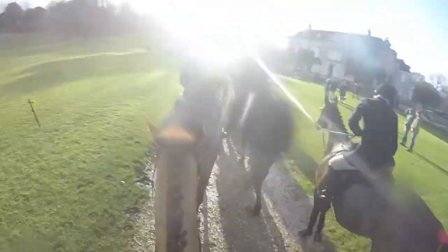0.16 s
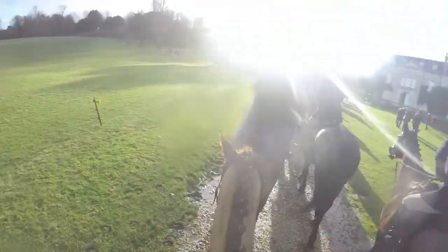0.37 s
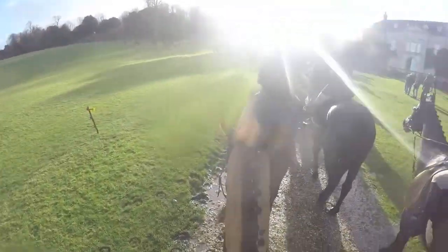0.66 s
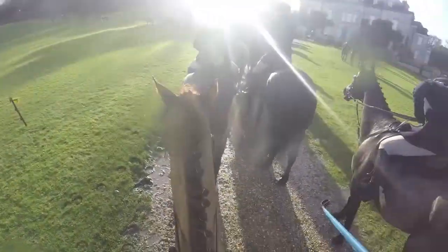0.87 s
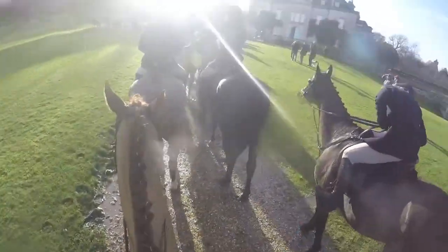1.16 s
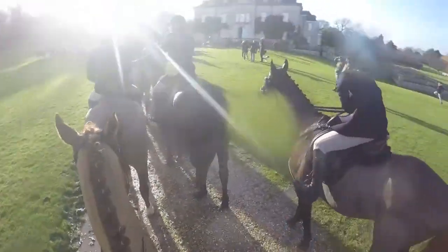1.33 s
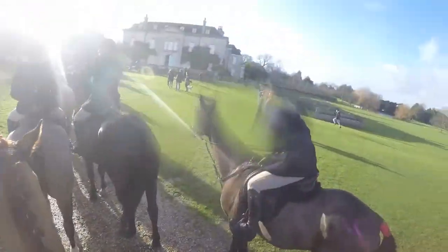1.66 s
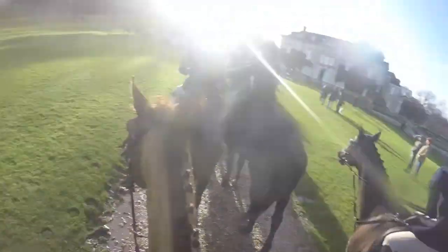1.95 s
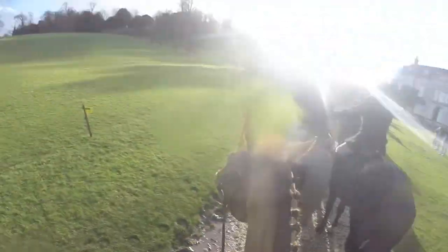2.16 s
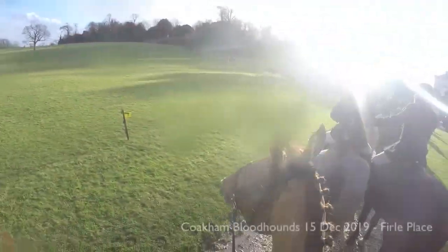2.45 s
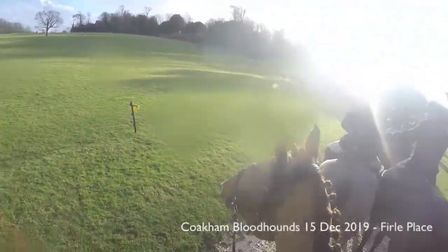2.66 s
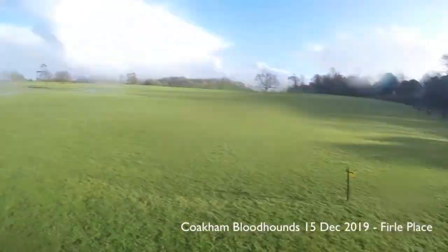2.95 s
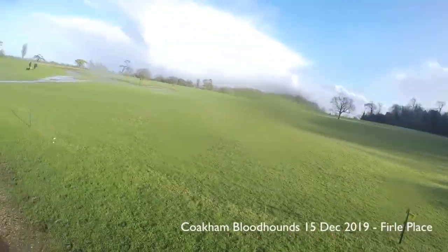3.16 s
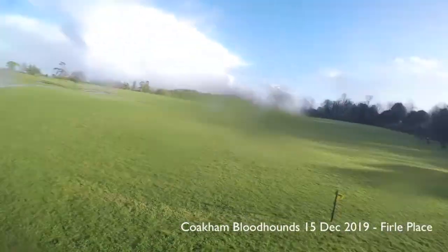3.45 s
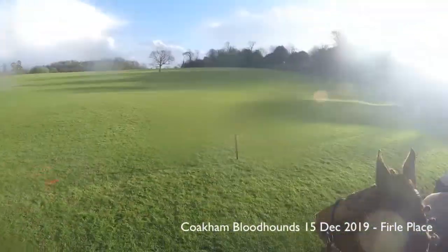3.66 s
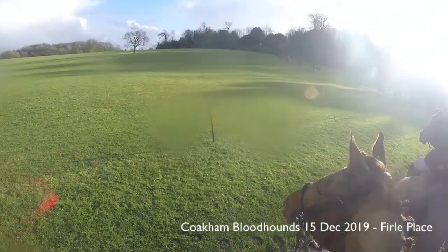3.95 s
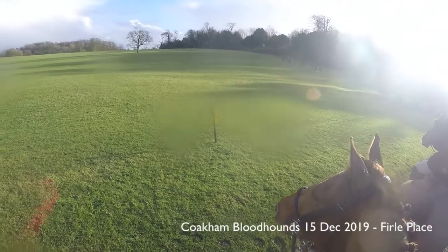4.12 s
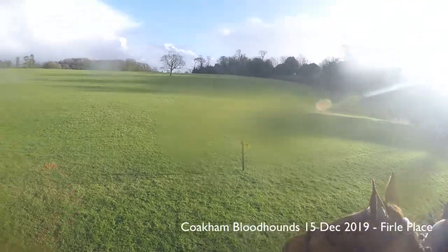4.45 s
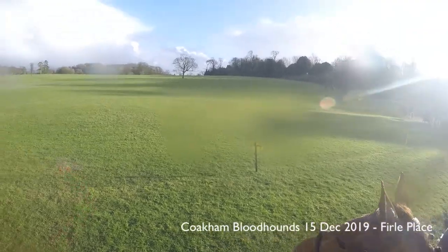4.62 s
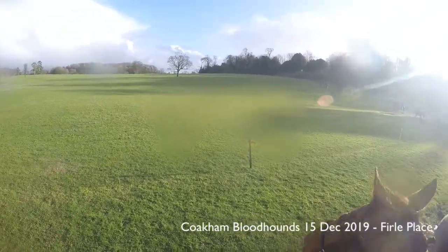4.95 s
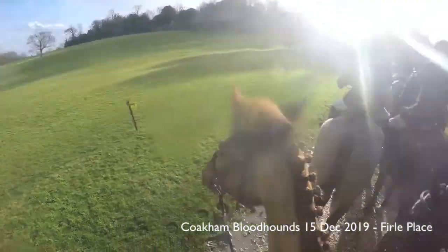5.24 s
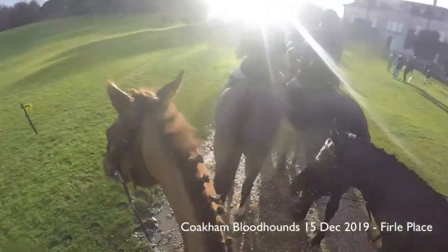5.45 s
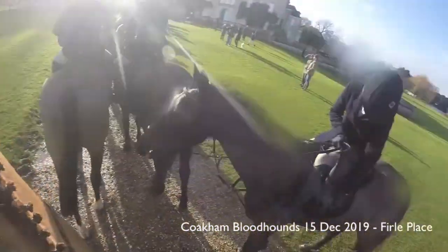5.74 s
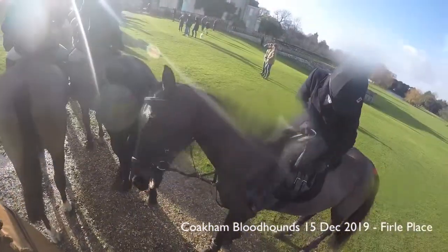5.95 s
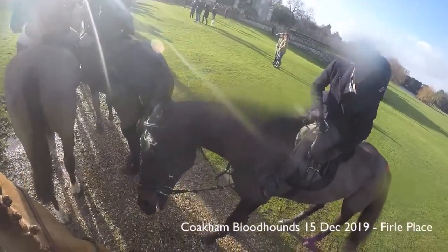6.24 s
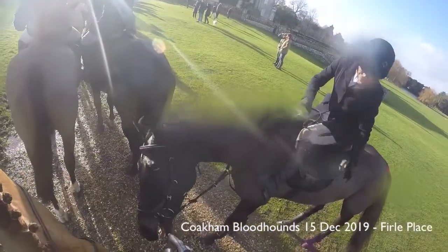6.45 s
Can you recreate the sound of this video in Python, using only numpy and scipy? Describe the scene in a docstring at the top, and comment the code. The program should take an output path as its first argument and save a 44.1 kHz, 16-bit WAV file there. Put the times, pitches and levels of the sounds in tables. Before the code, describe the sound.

Outdoors, heard from a rider's small camera, hooves grind and click on damp gravel over a low, light wind. A sharp, close knock on the camera stands out early as the loudest sound, followed by a few small ticks. The hoof sounds grow sparse and quiet, with a brief faint rustle of cloth, before a hoof clops more clearly near the end. There is no echo.

```python
"""Hooves crunch and clack on a wet gravel track as horses shuffle in open parkland, heard from a small
camera worn by a rider. The gravel is thousands of tiny contacts, each ringing a pebble; hooves clop
and squelch, and tack chinks. One hard knock rings the camera's case, whose resonances colour the
stones too. Close by, the mount ticks and a sleeve rubs, while light wind rumbles on the case."""
import sys
import numpy as np
from scipy import signal
from scipy.fft import rfft, irfft, next_fast_len
from scipy.io import wavfile
from scipy.ndimage import uniform_filter1d

SR = 44100
rng = np.random.default_rng(int(sys.argv[2]) if len(sys.argv) > 2 else 0)


def generate_wav(signal):
    """Clip the signal to [-1, 1] and save it as 16-bit WAV at the path in sys.argv[1]."""
    frames = np.transpose(np.atleast_2d(signal))
    scaled = np.clip(frames, -1, 1) * 32767
    pcm = np.round(scaled).astype(np.int16)
    wavfile.write(sys.argv[1], SR, pcm)


N = 290220
TIME = np.arange(N) / SR

# Cue levels are faders: a layer may add its own trim.
# A hoof presses or drags through gravel. Each row: start and length in seconds, grit level in dB,
# then body and wet spray in dB against the grit.
CRUNCHES = [(0.029, 0.049, -54, -9, -39), (0.12, 0.063, -49.5, -34, -17.5),
            (0.289, 0.017, -45.5, -8.5, -20), (0.401, 0.025, -49.5, -7.5, -12.5),
            (0.425, 0.043, -43, -7.5, -27), (0.606, 0.023, -48, -27, -27), (0.66, 0.071, -45.5, -16, -27),
            (0.732, 0.009, -45, -29, -4.5), (0.807, 0.067, -44.5, -28, -20),
            (0.895, 0.081, -45.5, -37, -15.5), (1.001, 0.041, -45.5, -13, -31),
            (1.164, 0.017, -48, -15, -18), (1.236, 0.028, -58, 0.5, -12), (1.379, 0.022, -49, -19, -20.5),
            (1.744, 0.028, -47.5, -12, -31), (1.796, 0.016, -72.5, -18, 10), (1.828, 0.043, -59, -12, -5),
            (2.283, 0.029, -59, -5, -26), (2.343, 0.042, -57.5, -11, -21),
            (2.618, 0.0092, -48.5, -26, -17.5), (2.712, 0.035, -57.5, -11, -7),
            (3.171, 0.021, -61.5, -25, -2.5), (3.229, 0.016, -51, -19, -12.5),
            (3.382, 0.032, -64, -15.5, -7), (4.505, 0.033, -53.5, -25, -15.5), (4.645, 0.026, -65, -2, -17),
            (4.836, 0.027, -66, -3, -17), (5.034, 0.037, -56.5, -31.5, -17), (5.243, 0.052, -54, -38, -19),
            (5.288, 0.028, -58, -25, -7), (5.414, 0.022, -68, -18, 4), (5.47, 0.011, -55, -2, -5.5),
            (5.802, 0.015, -59, -24, -13), (5.893, 0.064, -61.5, -16.5, -32),
            (6.291, 0.035, -62, -19.5, -17.5)]
# Hard hits of shoes, stones and tack. Each row: start in seconds, mid level in dB, then body and top
# in dB against the mid.
CLACKS = [(0.627, -39, -12.5, -28), (1.061, -47.5, -18, -15), (1.085, -45, -32, -22),
          (1.139, -49.5, -5, -16), (1.3515, -45.5, -11.5, -21), (1.786, -48.5, -20, -4.5),
          (1.992, -59, -12, -9.5), (2.914, -66.5, -25, 3), (2.992, -46.5, -7, -8.5),
          (3.414, -66.5, 11, -16.5), (4.352, -66.5, -13, -9), (4.515, -53, -16, -10),
          (4.911, -63, -15, -24), (5.368, -49, -4, -13), (5.464, -58.5, -6, 0), (5.752, -42, -9, -19.5),
          (6.448, -50.5, -15.5, -38)]
# How hard all the horses stir the gravel. Each row: time in seconds, grit level in dB.
GRAVEL_STIR = [(0.0, -47), (0.13, -55.5), (0.38, -54.5), (0.88, -49.5), (1.15, -53.5), (1.36, -57.5),
               (1.76, -55), (1.91, -60.5), (2.71, -64.5), (2.91, -58), (3.08, -64), (3.7, -68), (4.56, -68),
               (5.42, -58.5), (6.21, -65), (6.58, -61)]
# Large stones (body), small ones (grit), wet sand (spray). Each row: low and high edge in Hz.
STONE_GRADES = [(500, 1400), (1400, 6000), (6000, 15000)]
# The gravel's tone through the case. Each row: frequency in Hz, spectral level in dB.
GRAVEL_EQ = [(300, -12.5), (530, -21), (800, -13.5), (1060, -11), (1420, -12), (1620, 0.5), (1770, 0.5),
             (1950, -7), (2680, -6.5), (2950, 0.5), (3250, 2), (3620, -11), (3850, -5.5), (4250, -9.5),
             (4720, -16), (5200, -11.5), (6100, -24), (7000, -23.5), (7800, -25), (9000, -29), (10200, -26),
             (12000, -35), (15000, -38.5)]
# Square hoof landings. Each row: start in seconds, level in dB.
CLOPS = [(0.1262, -47), (0.3015, -48), (1.2515, -49), (2.6212, -59), (3.2432, -60), (5.3705, -46.5),
         (5.7532, -37.5), (5.7632, -43)]
# A hoof's hollow ring. Each row: pitch in Hz, level in dB, seconds to fade by 60 dB.
HOOF_MODES = [(650, -7, 0.025), (890, -2.5, 0.014), (1060, -4, 0.033), (2060, -7, 0.057), (3004, -1, 0.041),
              (3900, 0, 0.013)]
# Pebbles and tack links. Each row: start in seconds, level in dB, pitch in Hz, seconds to fade by 60 dB.
CHINKS = [(0.039, -38, 1600, 0.041), (0.683, -38, 3110, 0.015), (0.707, -31.5, 1780, 0.03),
          (1.0228, -33.5, 1720, 0.061), (1.04, -37.5, 1715, 0.042), (2.156, -45, 9960, 0.0094),
          (2.36, -43.5, 3110, 0.038), (2.993, -39, 11000, 0.0073), (4.304, -47.5, 3206, 0.035),
          (5.277, -43, 3130, 0.05), (6.4518, -39.5, 2020, 0.021)]
# Wet ground under a hoof. Each row: centre and width in seconds, level in dB, pitch in Hz.
SQUELCHES = [(1.143, 0.0073, -53.5, 785), (1.762, 0.0062, -49, 970), (2.362, 0.022, -62.5, 1120),
             (2.732, 0.011, -58.5, 1060), (4.6, 0.039, -67.5, 1210), (5.05, 0.018, -68, 650),
             (5.63, 0.027, -67, 1284)]
# Blows on the case. Each row: start in seconds, strength in dB.
KNOCKS = [(0.8067, 4), (0.9495, -28)]
# The ring of case and mount. Each row: pitch in Hz, level in dB, seconds to fade by 60 dB.
CASE_MODES = [(36, -26, 0.34), (68, -25, 0.031), (107.9, -24.5, 0.11), (143, -22.5, 0.1), (184.3, -7, 0.05),
              (259, -4.5, 0.033), (332, -15.5, 0.048), (568, -26.5, 0.05), (741, -19, 0.042),
              (821, -18, 0.03), (1038, -7.5, 0.019), (1220, -7.5, 0.014), (1660, -12.5, 0.023),
              (1960, -18, 0.035), (2290, -18, 0.018), (3000, -21, 0.01), (3580, -23.5, 0.01),
              (5440, -19.5, .005)]
# The camera's mount shifts. Each row: start in seconds, level in dB, pitch in Hz.
MOUNT_TICKS = [(0.9471, -19, 3150), (0.955, -31, 3590), (1.5917, -32, 2910), (1.622, -42, 2940),
               (1.64, -38, 2930), (2.156, -29.5, 3060)]
# A sleeve rubs as the rider turns. Each row: time in seconds, friction level in dB.
SLEEVE_RUB = [(2.76, -76), (2.86, -59.5), (2.93, -67), (3.03, -57.5), (3.3, -69.5), (3.52, -63),
              (3.66, -88)]
# The cloth's tone. Each row: frequency in Hz, spectral level in dB.
CLOTH_EQ = [(500, -23.5), (1400, -12.5), (1750, -1), (2000, -7), (2600, -4), (3300, 0), (3750, -16.5),
            (8000, -32)]
# Steady airflow over the case. Each row: time in seconds, rumble level in dB.
WIND_FLOW = [(0.0, -54.5), (0.75, -55), (0.9, -44.5), (2.55, -59), (3.02, -54.5), (3.61, -54.5),
             (4.65, -62), (5.41, -53), (6.05, -62), (6.58, -56.5)]
# Short buffets. Each row: centre and width in seconds, level in dB, eddy pitch in Hz.
GUSTS = [(0.26, 0.032, -35.5, 31.7), (0.95, 0.044, -31, 32.7), (1.37, 0.021, -38, 31),
         (1.6, 0.092, -59.5, 112), (2.86, 0.025, -58, 195), (2.97, 0.059, -42.5, 107.7),
         (2.98, 0.033, -60.5, 226.3), (3.45, 0.023, -56.5, 88.8), (3.69, 0.059, -48, 70),
         (3.72, 0.047, -66, 158), (5.31, 0.042, -40.5, 31), (5.73, 0.036, -43, 30.8)]
# The tones of rumble and open air through the case. Each row: frequency in Hz, spectral level in dB.
RUMBLE_EQ = [(10, -21.5), (20, 1.5), (30, 1), (48, -4), (70, -21.5), (120, -26.5), (300, -39), (1000, -84)]
AIR_EQ = [(100, 0.5), (200, -6.5), (400, -8), (800, -8.5), (1400, -17.5), (1700, -8.5), (1950, -12),
          (2600, -8), (3150, -27.5), (3650, -36), (6500, -19), (9200, -25), (10200, -24), (15000, -29.5)]


def crunches(level_db=1.0, rise_s=0.012, settle_s=0.0064):
    """Stones slip while the hoof loads them, then settle."""
    force = np.zeros((3, N))
    age = np.arange(SR // 5) / SR
    for start, length, grit_db, body_db, spray_db in CRUNCHES:
        at = round(start * SR)
        press = np.clip(age / rise_s, 0, 1) * np.exp(-np.maximum(age - length, 0) / settle_s)
        gains = from_db(level_db + grit_db + np.array([[body_db], [0], [spray_db]]))
        force[:, at:at + len(age)] += (gains * press)[:, :N - at]
    return stones(force, per_s=3000, spread_db=-0.5, sharpness=4.6)


def clacks(level_db=3.0, body_s=0.0034, mid_s=0.0042, top_s=0.0099, scatter_db=-19, scatter_s=0.0074):
    """A hard contact cracks and dies fast, the top lasting longest; a little grit scatters after it."""
    force = np.zeros((3, N))
    age = np.arange(SR // 10) / SR
    crack = np.exp(-age / np.array([[body_s], [mid_s], [top_s]]))
    scatter = from_db(scatter_db) * np.exp(-age / scatter_s)
    for start, mid_db, body_db, top_db in CLACKS:
        at = round(start * SR)
        gains = from_db(level_db + mid_db + np.array([[body_db], [0], [top_db]]))
        force[:, at:at + len(age)] += (gains * (crack + scatter))[:, :N - at]
    return stones(force, per_s=SR, spread_db=-2.5, sharpness=12.6)


def shuffling(level_db=-4.0, body_db=-8.5, spray_db=-15.0, flutter_db=-0.04):
    """Many hooves grind a steady bed of gravel that swells with each distant step."""
    grit_db = fader(GRAVEL_STIR) + level_db + flutter_db * drift(60)
    force = far_steps() * from_db([grit_db + body_db, grit_db, grit_db + spray_db])
    return stones(force, per_s=11000, spread_db=2.0, sharpness=1.4)


def far_steps(per_s=9, strength=1.1, spread_db=4.0, rise_s=0.0073):
    """A gain on the grinding: other horses step at random, each step pressing briefly and fading."""
    landings = rng.random(N) < per_s / SR
    weights = from_db(spread_db * np.clip(rng.standard_normal(N), -2, 1))
    rise = np.arange(SR // 5) / SR / rise_s
    return 1 + strength * signal.fftconvolve(landings * weights, rise * np.exp(1 - rise))[:N]


def loose_pebbles(body_db=-15, grit_db=-6, spray_db=-28):
    """Single pebbles flip and ring out of the grinding."""
    stir_db = fader(GRAVEL_STIR)
    force = from_db([stir_db + body_db, stir_db + grit_db, stir_db + spray_db])
    return stones(force, per_s=160, spread_db=1.0, sharpness=14)


def stones(force, per_s, spread_db, sharpness):
    """Random contacts each ring one pebble (sharpness is its Q); force holds one envelope per grade."""
    pitches = np.geomspace(500, 15000, num=22)
    at = np.flatnonzero(rng.random(N) < per_s / SR)
    sizes = from_db(spread_db * np.minimum(rng.exponential(1, N), 4))
    kicks = rms_one((sizes * rng.choice([-1, 1], N))[at])
    pebble = rng.integers(0, len(pitches), N)[at]
    # allow for the EQ's gain in each grade, so that force sets the balance
    eq_hz, eq_db = np.transpose(GRAVEL_EQ)
    power = from_db(np.interp(np.log(np.arange(1, SR // 2)), np.log(eq_hz), eq_db)) ** 2
    eq_gain = np.array([np.sqrt(2 * power[low:high].sum() / SR) for low, high in STONE_GRADES])
    rattle = np.zeros(N)
    for k, hz in enumerate(pitches):
        # neighbouring grades crossfade
        share = np.array([1 / (1 + (low / hz) ** 8 + (hz / high) ** 8) for low, high in STONE_GRADES])
        struck = pebble == k
        clicks = np.full(N, 1e-18)
        clicks[at[struck]] = kicks[struck] * ((share / share.sum() / eq_gain) @ force[:, at[struck]])
        rattle += signal.lfilter(*signal.iirpeak(hz, sharpness, fs=SR), clicks)
    return colour(rattle * np.sqrt(2 * sharpness * N / len(at)), GRAVEL_EQ)


def clops():
    """A shod hoof lands squarely and rings its hollow modes, in alternating polarity."""
    landings = impulses(CLOPS)
    return sum((-1) ** k * from_db(db) * ring(landings, hz, t60)
               for k, (hz, db, t60) in enumerate(HOOF_MODES))


def chinks():
    """Pebbles and links of tack each ring briefly on one pitch."""
    return sum(ring(impulses([(start, db)]), hz, t60) for start, db, hz, t60 in CHINKS)


def squelches():
    """Water and air squeeze out of the small hollow under a hoof."""
    return swells(SQUELCHES, ratio=1.13)


def knocks(bounce_s=0.00922, bounce_db=-13, crack_s=0.0019, crack_db=-32, lag_s=0.003, mount_hz=450):
    """A blow cracks, bounces once and rings the case; the heavy mount's low modes follow just after."""
    first = from_db(-0.3) * impulses(KNOCKS)
    bounce = low_pass(np.roll(first, round(bounce_s * SR)), hz=1700, order=2)
    blows = first + from_db(bounce_db) * bounce
    late = np.roll(blows, round(lag_s * SR))
    body = sum(from_db(db) * ring(late if hz < mount_hz else -blows, hz, t60)
               for hz, db, t60 in CASE_MODES)
    contact = signal.lfilter([1], [1, -np.exp(-1 / (crack_s * SR))], first + 1e-18)
    crack = from_db(crack_db) * contact * rng.standard_normal(N)
    return low_pass(body + crack, hz=5000, order=3)  # a blunt contact rounds the attack


def mount_ticks(level_db=-3.0, swell_s=0.0015, tail_db=-17, tail_s=0.02):
    """Each slip swells for a few cycles in the case's narrow resonance and leaves a faint ring."""
    ticks = np.zeros(N)
    for start, db, hz in MOUNT_TICKS:
        age = np.maximum(TIME - start, 0)
        swell = (age / swell_s * np.exp(1 - age / swell_s)) ** 2
        tail = from_db(tail_db) * np.exp(-age / tail_s)
        ticks += from_db(db + level_db) * (swell + tail) * np.sin(2 * np.pi * hz * age)
    return ticks


def sleeve(rasp_db=2.0, catches_per_s=200):
    """Cloth catches and slips as it slides, so its friction noise rasps."""
    friction = from_db(fader(SLEEVE_RUB) + rasp_db * drift(catches_per_s))
    return friction * rms_one(colour(rng.standard_normal(N), CLOTH_EQ))


def wind(rumble_db=5.0, waver_db=1.2, wavers_per_s=7, hiss_db=-71):
    """Slow eddies rumble, gusts buffet the case, and the open air hisses faintly."""
    flow = from_db(fader(WIND_FLOW) + rumble_db + waver_db * drift(wavers_per_s))
    rumble = flow * evened(colour(rng.standard_normal(N), RUMBLE_EQ))
    hiss = from_db(hiss_db) * rms_one(colour(rng.standard_normal(N), AIR_EQ))
    return rumble + swells(GUSTS, ratio=1.4) + hiss


def camera_whine(hz=8560, period_s=1 / 24.1, pulse_s=0.004, level_db=-78.5):
    """The camera's electronics give a faint high pip many times a second."""
    pips = np.exp(-((TIME % period_s - period_s / 2) / pulse_s) ** 2)
    return from_db(level_db) * pips * np.sin(2 * np.pi * hz * TIME)


def swells(rows, ratio):
    """Bell-shaped swells of noise, each in a band reaching ratio above and below its pitch."""
    total = np.zeros(N)
    for centre, width, db, hz in rows:
        envelope = np.exp(-np.minimum(((TIME - centre) / width) ** 2 / 2, 20))
        band = signal.butter(3, [hz / ratio, hz * ratio], "band", fs=SR, output="sos")
        total += from_db(db) * envelope * evened(signal.sosfilt(band, rng.standard_normal(N)))
    return total


def impulses(rows):
    """One click for each start in seconds and level in dB."""
    clicks = np.zeros(N)
    for start, db in rows:
        clicks[round(start * SR)] += from_db(db)
    return clicks


def ring(clicks, hz, t60):
    """Each click starts a sine that fades by 60 dB in t60 seconds."""
    decay, step = from_db(-60 / (t60 * SR)), 2 * np.pi * hz / SR
    return signal.lfilter([0, np.sin(step)], [1, -2 * decay * np.cos(step), decay ** 2], clicks + 1e-18)


def colour(x, eq):
    """Minimum-phase EQ: nothing rings ahead of a hit."""
    size = next_fast_len(N + SR // 2, real=True)
    hz, db = np.transpose(eq)
    bin_hz = np.arange(size // 2 + 1) * SR / size
    log_gain = np.log(from_db(np.interp(np.log(bin_hz + 1), np.log(hz), db)))
    cepstrum = irfft(log_gain, size)
    cepstrum[1:] *= 2 * (np.arange(1, size) < size // 2)
    return irfft(rfft(x, size) * np.exp(rfft(cepstrum)), size)[:N]


def low_pass(x, hz, order):
    """Roll off the top."""
    return signal.sosfilt(signal.butter(order, hz, fs=SR, output="sos"), x + 1e-18)


def evened(x):
    """Ride noise to a steady strength, so that its envelope sets the level."""
    x = rms_one(x)
    return x / np.sqrt(uniform_filter1d(x ** 2, size=SR // 10) + 0.05)


def fader(rows):
    """A level curve in dB, drawn out to every sample."""
    return np.interp(TIME, *np.transpose(rows))


def drift(per_s):
    """A random wobble of unit power, with per_s new targets a second."""
    return rms_one(np.interp(TIME * per_s, np.arange(4096), rng.standard_normal(4096)))


def rms_one(x):
    """Scale to unit power."""
    return x / np.sqrt(np.mean(x ** 2) + 1e-20)


def from_db(db):
    """Decibels to gain."""
    return 10 ** (np.asarray(db) / 20)


def scene():
    """Open ground gives no echo: horses, rider and wind mix dry, in mono."""
    horses = shuffling() + loose_pebbles() + crunches() + squelches() + clacks() + clops() + chinks()
    rider = mount_ticks() + knocks() + sleeve() + camera_whine()
    return (horses + rider + wind())[None]


def record(dry):
    """The microphone overloads softly on the knock; the top is cut steeply."""
    ceiling, cutoff_hz = 0.39, 15400
    saturated = ceiling * np.tanh(dry / ceiling)
    return signal.sosfilt(signal.ellip(10, 0.2, 80, cutoff_hz, fs=SR, output="sos"), saturated)


dry = scene()
out = record(dry)
generate_wav(out)
```